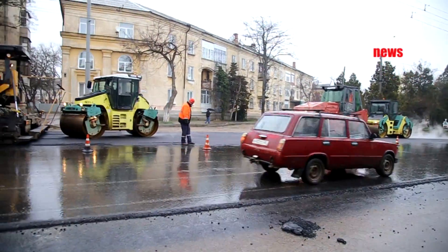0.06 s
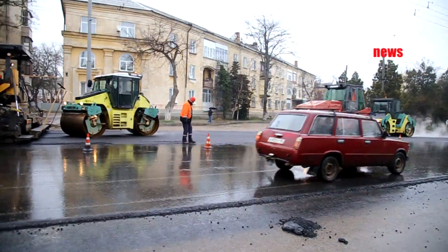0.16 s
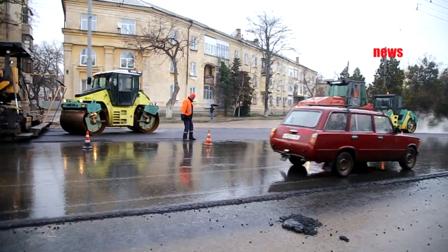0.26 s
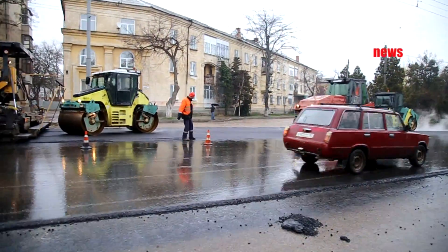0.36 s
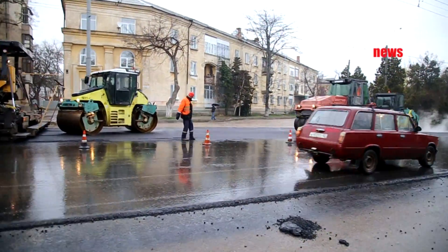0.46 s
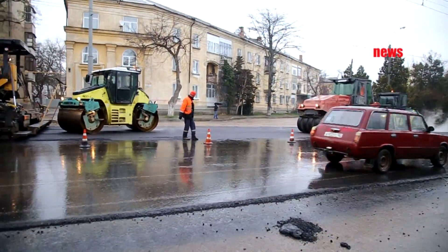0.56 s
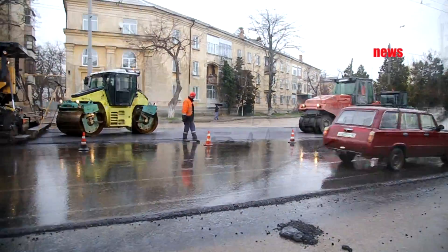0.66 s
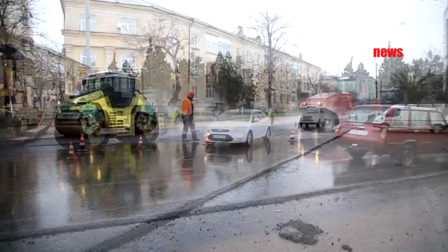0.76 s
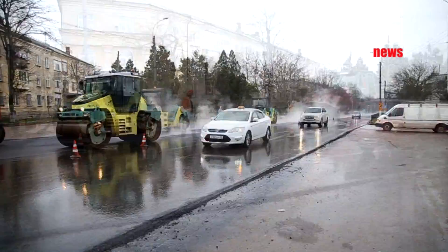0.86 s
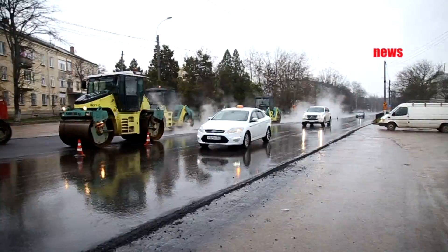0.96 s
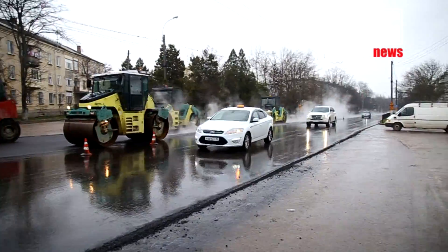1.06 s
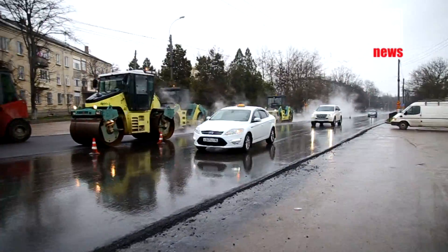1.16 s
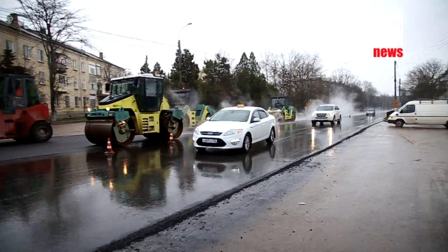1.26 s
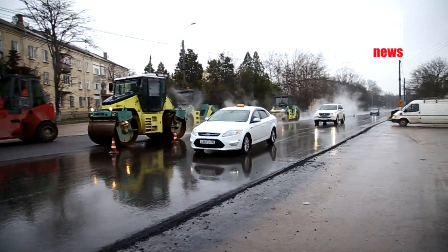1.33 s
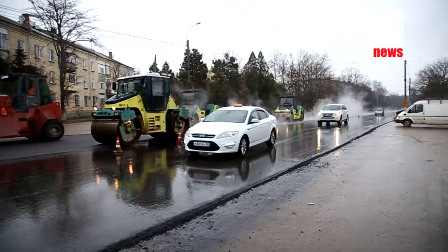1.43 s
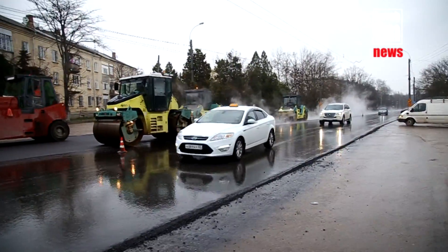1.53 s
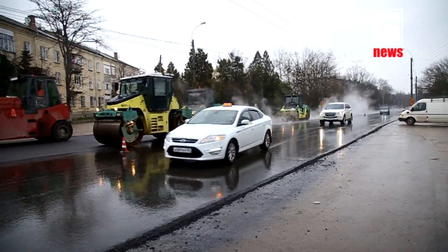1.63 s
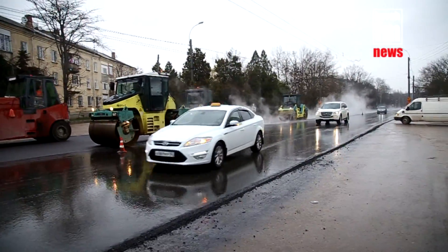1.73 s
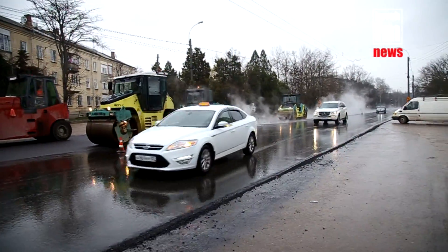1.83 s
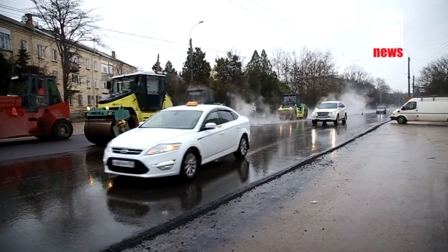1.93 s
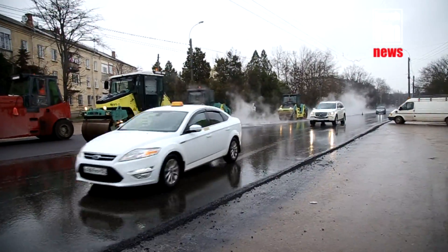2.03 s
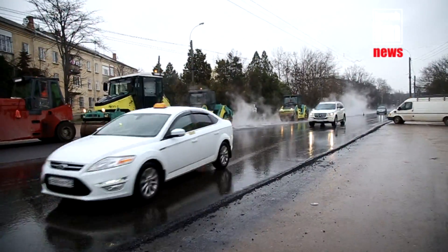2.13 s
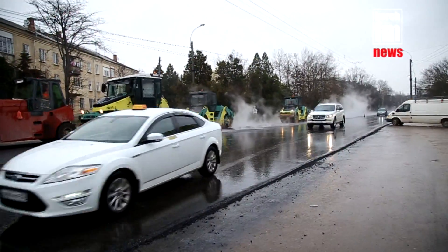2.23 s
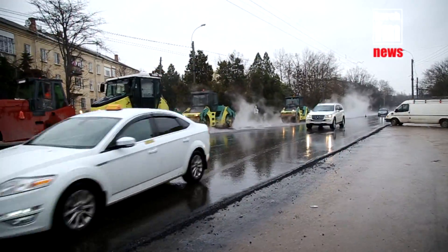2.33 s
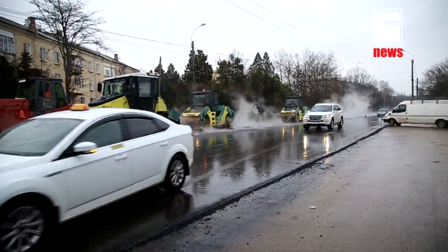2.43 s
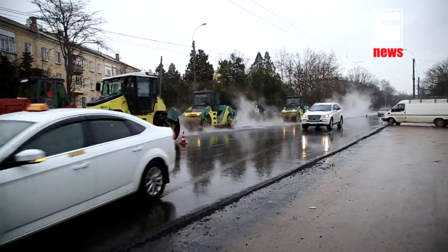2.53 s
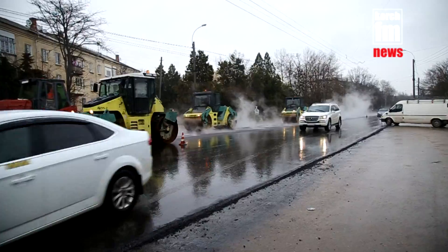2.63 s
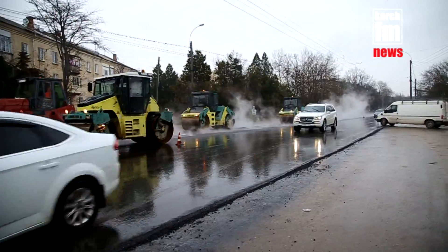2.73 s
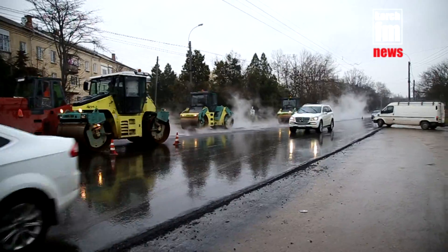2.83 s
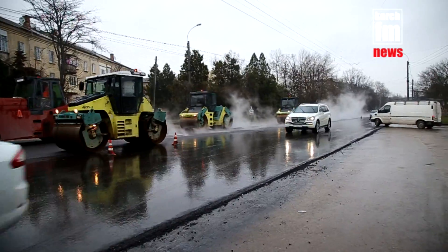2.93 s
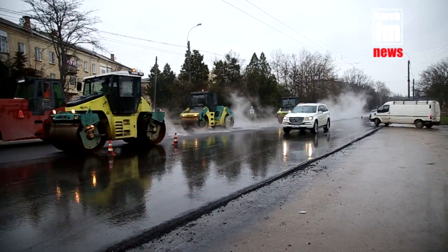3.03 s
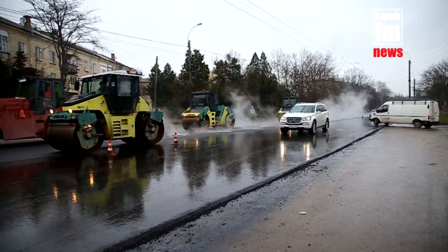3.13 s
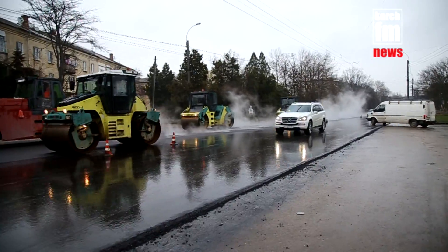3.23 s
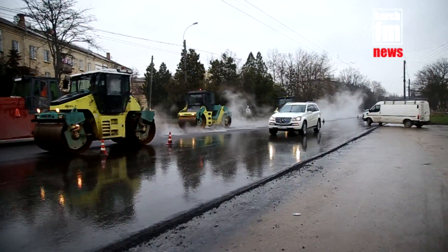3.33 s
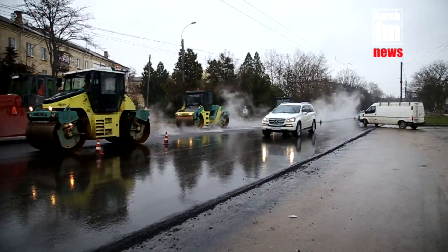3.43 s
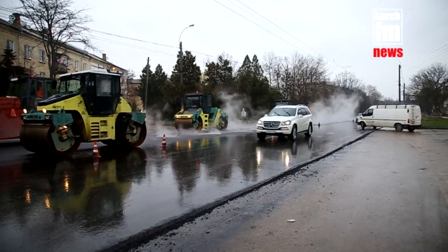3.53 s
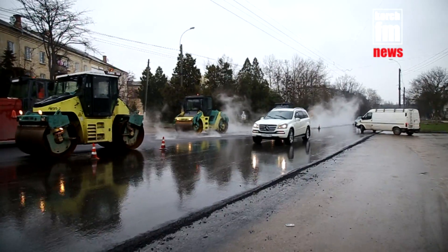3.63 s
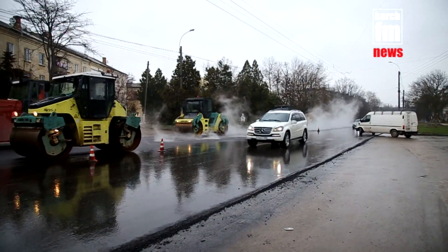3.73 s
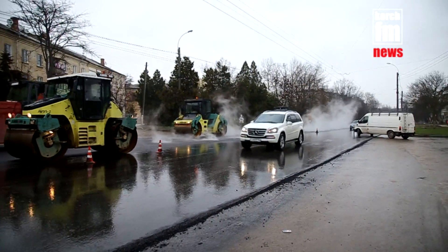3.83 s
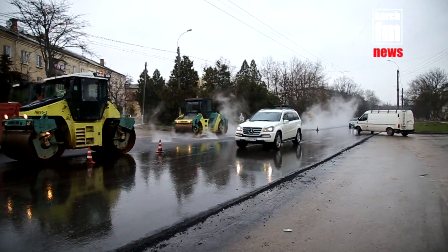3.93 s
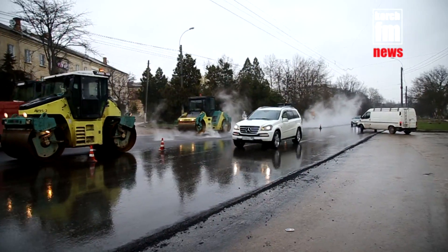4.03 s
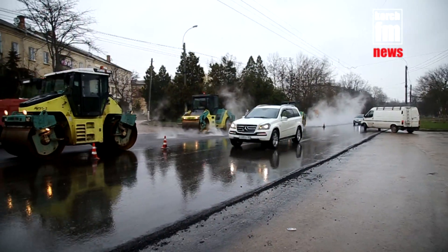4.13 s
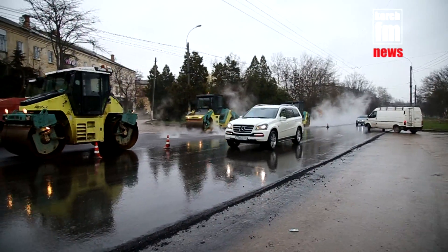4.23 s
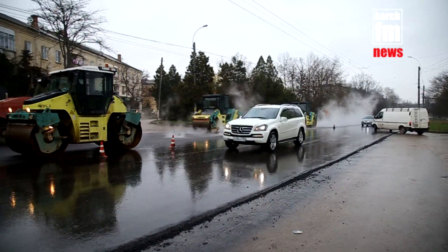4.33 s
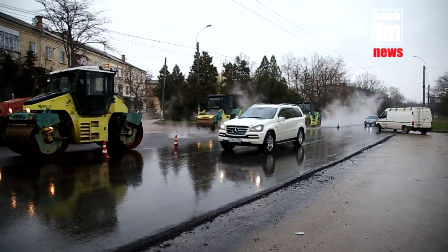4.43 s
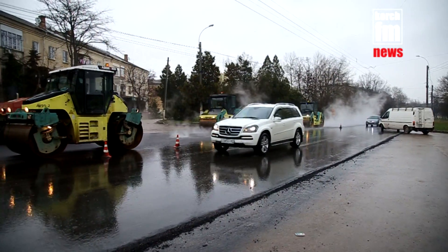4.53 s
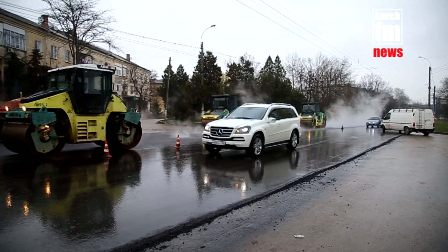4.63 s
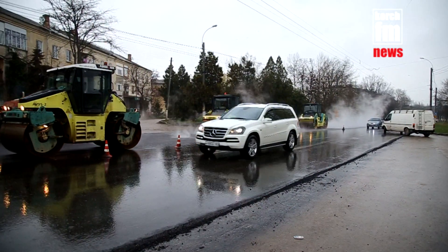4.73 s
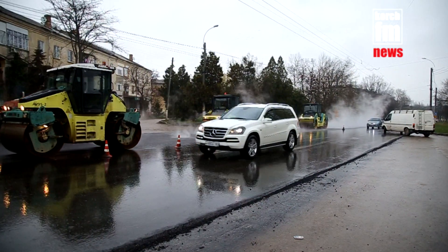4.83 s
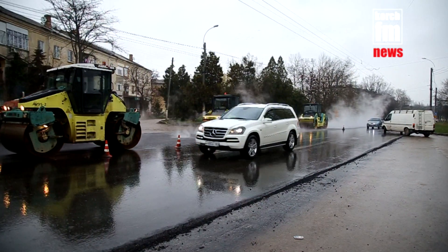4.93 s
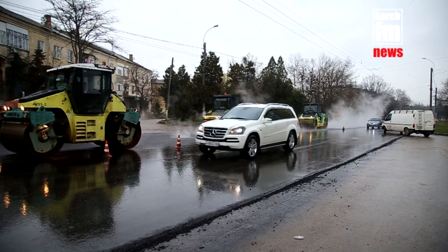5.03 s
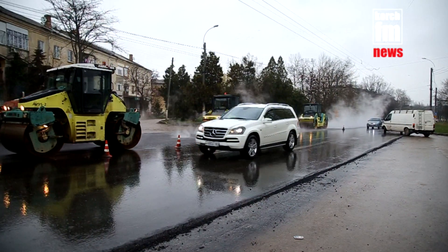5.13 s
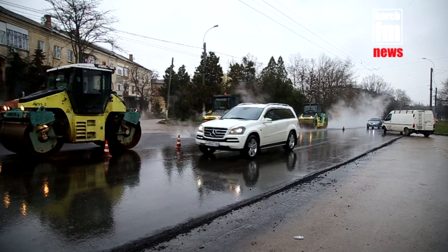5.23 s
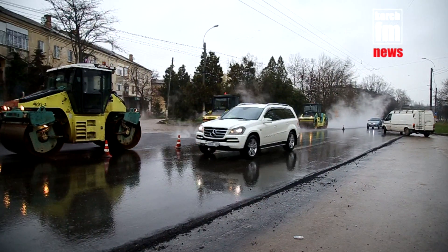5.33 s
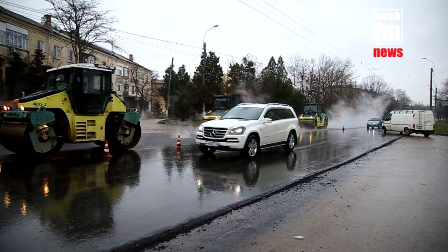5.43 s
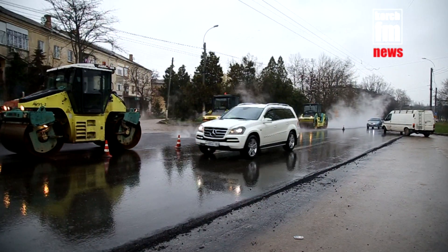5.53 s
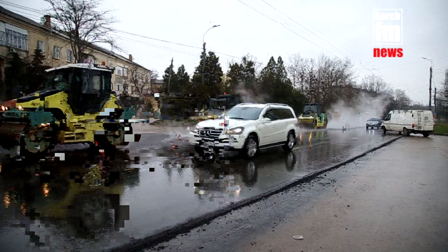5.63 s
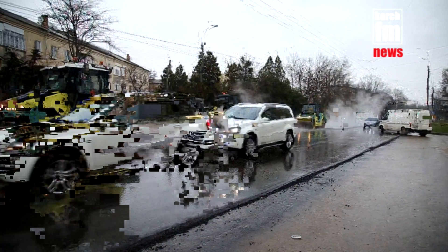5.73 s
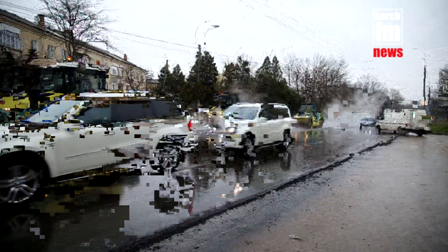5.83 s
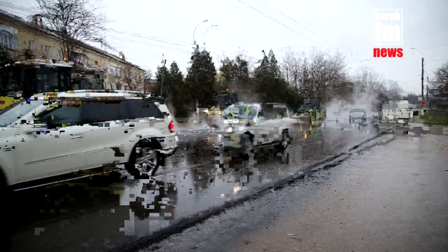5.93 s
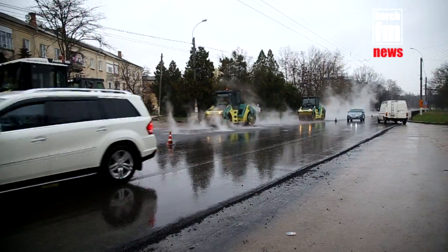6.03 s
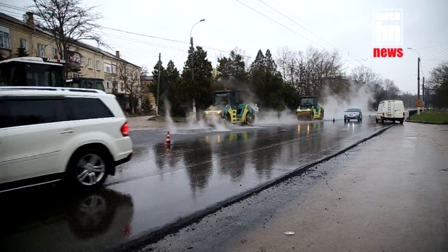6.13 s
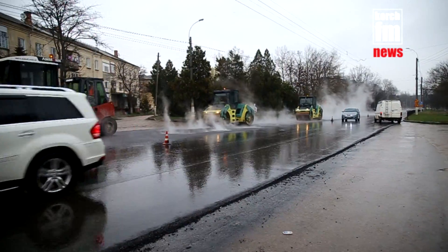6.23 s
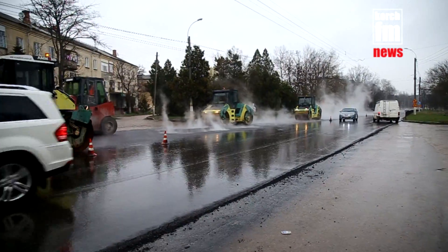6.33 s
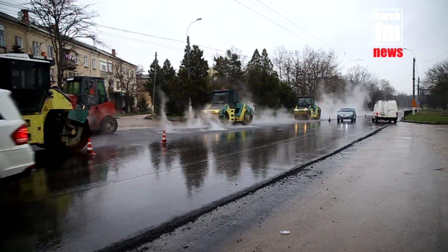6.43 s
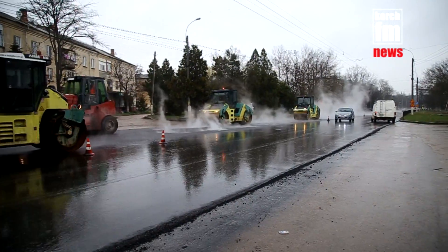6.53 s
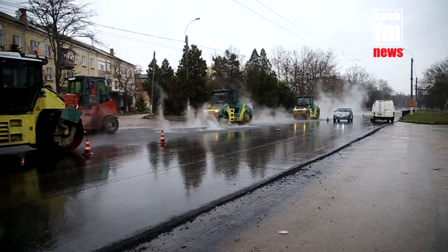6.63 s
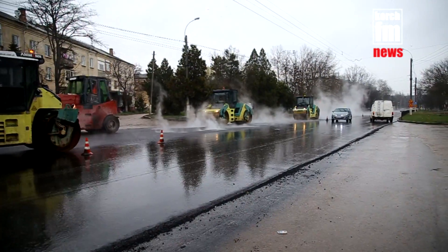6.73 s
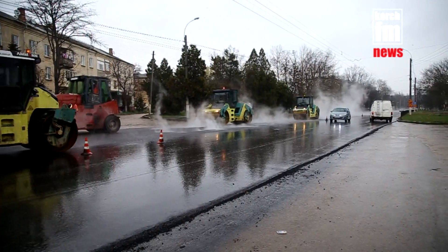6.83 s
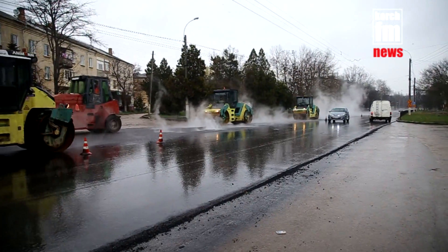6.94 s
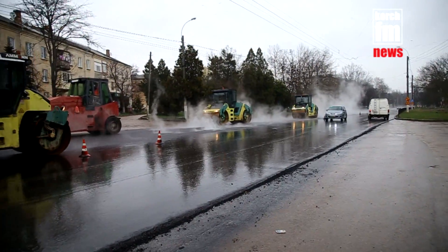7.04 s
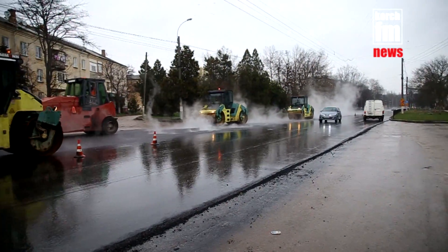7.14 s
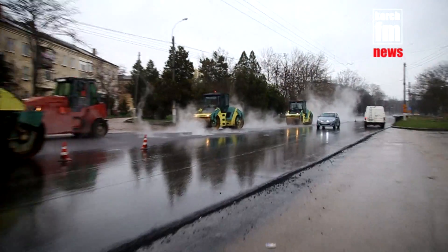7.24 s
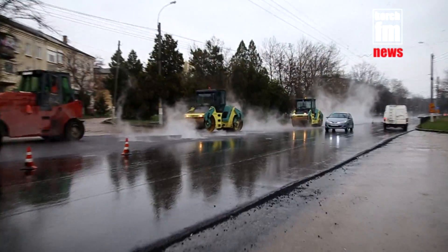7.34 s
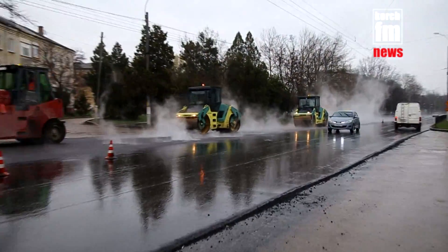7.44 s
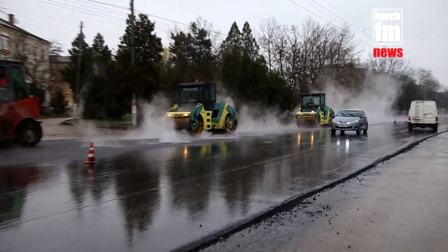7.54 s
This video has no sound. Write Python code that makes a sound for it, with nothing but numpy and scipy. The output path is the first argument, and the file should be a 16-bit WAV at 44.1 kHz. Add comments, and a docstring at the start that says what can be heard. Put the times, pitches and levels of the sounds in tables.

```python
"""Diesel road rollers work on fresh asphalt beside a wet street: from the outset their firings throb,
an exhaust drones, and a pump and gears whine. In the first second, friction excites a squeak and a
brake-like squeal. Cars then roll slowly past one after another, their treads hissing and spitting
water and grit. Just past the middle all sound drops out for most of a second; the engines
return, and two more cars pass."""
import sys
import numpy as np
from scipy import signal
from scipy.fft import rfft, irfft, next_fast_len
from scipy.io import wavfile
from scipy.ndimage import map_coordinates

SR = 44100
rng = np.random.default_rng(int(sys.argv[2]) if len(sys.argv) > 2 else 0)


def bounce(signal):
    """Save signal as a 16-bit WAV file at the path given by the first command-line argument."""
    frames = np.transpose(np.atleast_2d(signal))
    limited = np.clip(frames, -1, 1)
    pcm = np.round(limited * 32767).astype(np.int16)
    wavfile.write(sys.argv[1], SR, pcm)


N = 334100
TIME = np.arange(N) / SR


def from_db(db):
    """Amplitude ratio of a level in decibels."""
    return 10 ** (np.asarray(db) / 20)


def rms_one(x):
    """Normalisation to unit power."""
    return x / np.sqrt(np.mean(x ** 2) + 1e-20)


def in_time(table):
    """Linear interpolation of each column over the times in the first."""
    s, *columns = np.transpose(table)
    return [np.interp(TIME, s, c) for c in columns]


def bump(middle_s, half_s):
    """Gaussian envelope: 1 at the middle, 1/e at half_s to either side."""
    return np.exp(-((TIME - middle_s) / half_s) ** 2)


def drift(rate):
    """Low-pass noise of unit spread, changing about `rate` times a second."""
    step, settle = 40, 2000
    pole = np.exp(-2 * np.pi * step * rate / SR)
    noise = rng.standard_normal(N // step + settle + 2)
    slow = signal.lfilter([1], [1, -2 * pole, pole * pole], noise)[settle:]
    return np.interp(np.arange(N) / step, np.arange(len(slow)), rms_one(slow))


def colour(x, spectrum):
    """Spectral shaping to unit power, falling 30 dB an octave beyond the ends of the spectrum."""
    size = next_fast_len(N)
    log_hz = np.log2(np.maximum(np.arange(size // 2 + 1) * SR / size, 1))
    points, db = np.log2(np.array(spectrum)[:, 0]), np.array(spectrum)[:, 1]
    octaves_outside = np.abs(log_hz - np.clip(log_hz, points[0], points[-1]))
    gain = from_db(np.interp(log_hz, points, db) - 30 * octaves_outside)
    return rms_one(irfft(rfft(x, size) * gain, size)[:N])


def resonate(x, hz, width_hz):
    """A damped second-order resonator with unit peak gain."""
    r = np.exp(-np.pi * width_hz / SR)
    feedback = [1, -2 * r * np.cos(2 * np.pi * hz / SR), r * r]
    return signal.lfilter(np.array([1, 0, -1]) * (1 - r * r) / 2, feedback, x + 1e-18)


def turning(hz, wander):
    """Phase in cycles: the integral of a slightly unsteady frequency."""
    return rng.random() + np.cumsum(hz * (1 + wander * drift(1.97))) / SR


def tones(cycles, orders, flutter_db, rough=.15):
    """Harmonics of one phase, each with slow and fast random amplitude modulation."""
    out = 0
    for k, db in orders:
        level = from_db(db + flutter_db * drift(3.6)) * (1 + rough * drift(19))
        out = out + np.sqrt(2) * level * np.sin(2 * np.pi * (round(k) * cycles + rng.random()))
    return out


# Hums and moans among the machines.
# Each row: middle and half length in seconds, frequency and width in Hz, level in dB.
HUMS = [(.4, .5, 135, 45, -28), (.24, .09, 827, 12, -31.5), (1.899, .7, 203.6, 3.95, -30),
        (2.25, 0.25, 798, 45, -34.5), (2.732, 0.079, 728, 56, -27), (3.25, .23, 753, 44, -33),
        (3.68, 0.43, 591, 6, -33.5), (4.27, .1, 1137, 20, -31), (4.399, 0.16, 142.8, 9, -24),
        (6.684, .18, 192.8, 49.7, -25.5), (7.3, .16, 205.2, 70, -22.5)]
def hums():
    """Narrow resonances, briefly excited: each is a tone whose pitch wavers about its centre."""
    out = np.zeros(N)
    for s, half_s, hz, width_hz, db in HUMS:
        cycles = np.cumsum(hz + .5 * width_hz * drift(width_hz)) / SR
        out += np.sqrt(2) * from_db(db) * bump(s, half_s) * np.sin(2 * np.pi * cycles)
    return out


# Swells of the squeal. Each row: middle and half length in seconds, level in dB.
BRAKE_RUBS = [(.35, .24, -26.5), (.73, .11, -28.5)]
def brake(hz=1211):
    """Friction sustains one resonance, as in a rubbing brake: a tone in a narrow band of noise."""
    core = tones(turning(hz, wander=.0017), [(1, .0029)], flutter_db=0)
    haze = rms_one(resonate(rng.standard_normal(N), hz, width_hz=90))
    envelope = sum(from_db(db) * bump(s, half_s) for s, half_s, db in BRAKE_RUBS)
    return envelope * rms_one(core + .9 * haze)


# Course of the squeak. Each row: time in seconds, pitch in Hz, level in dB.
SQUEAK = [(.38, 2260, -58.5), (.39, 2245, -23.5), (.4, 2350, -28.5), (.42, 2320, -20), (.435, 2345, -61)]
# Its harmonics. Each row: multiple of the pitch, relative level in dB.
SQUEAK_ORDERS = [(1, 2.5), (4, -28), (5, -17.5)]
def squeak():
    """Friction of metal on metal excites a brief, scratchy vibration that slides up in pitch."""
    hz, db = in_time(SQUEAK)
    sounding = (TIME > SQUEAK[0][0]) & (TIME < SQUEAK[-1][0])
    scratch = 1 + .3 * drift(200)
    cycles = turning(hz * (1 + .0085 * drift(150)), wander=.00092)
    return sounding * scratch * from_db(db) * tones(cycles, SQUEAK_ORDERS, flutter_db=2)


# Stone chips under the tyres. Each row: start in seconds, level in dB, ring frequency in Hz.
GRIT = [(.012, -16, 4400), (.053, -11, 3620), (.143, -11, 4000), (.154, -8, 3810), (.164, -14, 4300),
        (.556, -12.5, 4100), (.632, -14, 3500), (2.444, -15, 4000), (6.269, -12.5, 3800),
        (6.572, -15, 5000), (6.687, -16, 3700), (6.807, -13.5, 3300)]
def grit(crack=.12, decay_s=.0027, scatter_hz=170):
    """Impact excitation: a chip flicked by a tread rings in three close modes, with a faint crack."""
    out = np.zeros(N)
    age = np.arange(SR // 20) / SR
    for s, db, hz in GRIT:
        modes = hz + scatter_hz * rng.standard_normal((3, 1))
        clink = np.sin(2 * np.pi * modes * age).mean(axis=0)
        broad = rms_one(resonate(resonate(rng.standard_normal(len(age)), hz, hz), hz, 2 * hz))
        start = round(s * SR)
        out[start:start + len(age)] += from_db(db) * (clink + crack * broad) * np.exp(-age / decay_s)
    return out


def droplets(per_s, spread_db):
    """Shot noise of unit power: random tiny impacts, mostly weak, a few strong."""
    sizes = from_db(spread_db * np.minimum(rng.exponential(1, N), 5)) * rng.choice([-1, 1], N)
    return rms_one(sizes * (rng.random(N) < per_s / SR))


def nearness(delay_s=0):
    """Geometry of a straight pass: each car's least distance over its present distance."""
    return np.array([
        1 / np.hypot(1, (TIME - s - delay_s) / np.where(TIME < s + delay_s, approach_s, departure_s))
        for s, approach_s, departure_s, *_ in CARS])


def traffic(near, cars_db, fall, far_db=-np.inf):
    """Incoherent sources add in power; each car's amplitude goes as 1 / distance ** fall."""
    each = from_db(cars_db)[:, None] * near ** fall
    return np.sqrt(np.sum(each ** 2, axis=0) + from_db(far_db) ** 2)


def road_reflection(x, near, lag_ms):
    """Interference with the echo off the wet road forms a faint comb, set by the nearest car."""
    strength = .24 * near.max(axis=0)
    weight = near ** 4
    lag_samples = lag_ms @ weight / weight.sum(axis=0) * SR / 1000
    echo = map_coordinates(x, [np.arange(N) - lag_samples], order=3)
    return (x + strength * echo) / np.sqrt(1 + strength ** 2)


# Passing cars. Each row: closest moment, approach time and departure time in seconds; levels of
# hiss, tread squelch, spray and fine mist in dB; lag of the road's reflection in milliseconds.
CARS = [(.95, 1.3, 0.43, -23.5, -39.5, -39.5, -50, .295), (2.45, 1.0, 0.52, -22.5, -28.5, -34, -41, 0.28),
        (4.5, 0.63, .4, -30, -44, -41, -54, .278), (6.2, 1.0, .7, -23.5, -30.5, -35, -39, .3),
        (7.45, 0.8, 0.8, -23.5, -32.5, -40, -64.5, 0.26)]
# Tyres crossing puddles. Each row: middle and half length in seconds, boost in dB.
PUDDLES = [(2.712, .045, 0), (3.01, .04, 4), (3.127, .055, 4.5), (5.897, .04, 1.2), (6.32, 0.039, 1),
           (6.742, .06, 1.3)]
# Spectra of the four tyre sounds and of the treble wash of distant traffic.
# Each row: frequency in Hz, relative spectral density in dB.
HISS = [(600, -16.5), (1200, 0.5), (2000, 3), (3200, -2.9), (4200, -9), (5200, -11), (6500, -21.5),
        (9000, -42)]
SQUELCH = [(2500, -8), (3200, -3), (3900, -4), (4500, -4.5), (5400, -13)]
SPRAY = [(3000, -15.5), (4500, 3.5), (5600, 4), (7000, 0.5), (8400, -3), (9500, -11), (12500, -22)]
MIST = [(7500, -16.5), (8900, -2), (10000, -0.5), (11000, 0), (12000, -1), (13500, -5.5), (15000, -14)]
WASH = [(4500, -2), (7000, -7), (10000, -6), (12500, -7), (15000, -20)]
def wet_tyres(fade_in_at_s=.82, rise_s=.1, muted_db=-9.5):
    """Treads squeeze water off the road and throw up drops, whose many impacts sum to noise."""
    *_, hiss_db, squelch_db, spray_db, mist_db, lag_ms = np.transpose(CARS)
    near = nearness()
    behind = nearness(delay_s=.14)  # squelch radiates backwards, so it peaks later
    # the spray and squelch start muted and fade in just before one second
    spray_fade_in = from_db(muted_db * (.5 - .5 * np.tanh((TIME - fade_in_at_s) / rise_s)))
    puddle_db = sum(db * bump(s, half_s) for s, half_s, db in PUDDLES)
    hiss = colour(droplets(per_s=14000, spread_db=3), HISS)
    hiss *= traffic(near, hiss_db, fall=1.95, far_db=-33.5)
    squelch = colour(droplets(per_s=3500, spread_db=4.5), SQUELCH)
    squelch *= spray_fade_in * traffic(behind, squelch_db, fall=2.1)
    drops = droplets(per_s=8300, spread_db=4)
    spray = colour(drops + .8 * rng.standard_normal(N), SPRAY)
    spray *= spray_fade_in * traffic(near, spray_db, fall=1.5)
    mist = colour(drops + .8 * rng.standard_normal(N), MIST)
    mist *= from_db(.5 * puddle_db) * traffic(near, mist_db, fall=2.1)  # surges most in puddles
    wash = from_db(-45.5) * colour(rng.standard_normal(N), WASH)
    sputter = from_db(puddle_db + .52 * drift(25))  # the water film is uneven
    return road_reflection(wash + (hiss + squelch + spray + mist) * sputter, near, lag_ms)


# Strength of the whines. Each row: time in seconds, pump level in dB, gear level in dB.
WHINE = [(0, -39, -40), (.7, -39, -35.5), (1.1, -54, -43), (3.3, -40, -45), (4.6, -36.5, -42),
         (5.5, -32, -37.5), (6.2, -36, -39), (6.9, -32, -39.5), (7.58, -34.5, -36)]
# Gear tones. Each row: multiple of the fast engine's firing rate, relative level in dB.
GEAR_ORDERS = [(16, -2), (17, -1), (32, -4.5), (34, -6.5)]
def pump_and_gears(engine_cycles, pump_hz=456.6):
    """Periodic forcing: a hydraulic pump sings one tone, and gears whine in step with the engine."""
    pump_db, gears_db = in_time(WHINE)
    pump = tones(turning(pump_hz, wander=.002), [(1, 0)], flutter_db=.4, rough=.25)
    gears = tones(engine_cycles, GEAR_ORDERS, flutter_db=1, rough=.86)
    return from_db(pump_db) * pump + from_db(gears_db) * gears


# Course of the drone. Each row: time in seconds, pitch in Hz, level in dB.
DRONE = [(0, 281.5, -25), (.45, 280.5, -21.5), (.9, 280.3, -27), (1.38, 278.8, -22), (2.25, 277.5, -32.5),
         (2.65, 278, -28.5), (3.15, 280, -19.5), (3.7, 278.7, -20.5), (4.6, 279.5, -23),
         (5.62, 277.7, -26.5), (5.85, 277, -36), (7.0, 277, -32), (7.58, 276.4, -44)]
# Its spells of beating. Each row: middle and half length in seconds, rate in Hz, depth in dB.
BEATS = [(1.061, .28, 6.6, 5), (4.115, .28, 25.6, 3)]
def exhaust_drone():
    """Amplitude modulation: one exhaust tone swells and fades as the rollers move, and briefly beats."""
    pitch_hz, level_db = in_time(DRONE)
    beat_db = sum(db * bump(s, half_s) * np.cos(2 * np.pi * hz * (TIME - s))
                  for s, half_s, hz, db in BEATS)
    tone = tones(turning(pitch_hz, wander=.001), [(1, 0)], flutter_db=1.04, rough=.089)
    return from_db(level_db + beat_db) * tone


def firing(cycles, fade, uneven_db):
    """A pulse train: each firing has its own strength and decays exponentially over its cycle."""
    strength = from_db(uneven_db * rng.standard_normal(1024))
    return rms_one(strength[cycles.astype(int) % len(strength)] * np.exp(-fade * (cycles % 1)))


# Engines under load. Each row: time in seconds, relative levels of rumble, clatter and throb in dB.
LOAD = [(0, -30.5, -28, -1.5), (.4, -24.5, -28, 1.5), (.97, -27, -30, -2.5), (1.2, -27.5, -26, 1.5),
        (2.2, -28, -27.5, 1), (2.55, -28, -29, 1.5), (3.6, -24, -25.5, -1.5), (4.6, -24, -26.5, 0),
        (5.6, -27.5, -26, -1), (6.7, -24, -26.5, 0), (7.58, -27.5, -27, -.5)]
# Tones of the three engines. Each row: multiple of the firing rate, relative level in dB.
SLOW_ORDERS = [(1, -36), (2, -33.5), (5, -35)]
FAST_ORDERS = [(1, -33.5), (2, -41.5)]
IDLE_ORDERS = [(1, -39.5), (2, -44.5), (6, -42)]
# Exhaust and body resonances. Each row: frequency and bandwidth in Hz, relative gain in dB.
BODY_MODES = [(143.8, 12, 1), (188.5, 20.3, 2.5), (229, 36, -1.5), (249.2, 16, 2), (306.2, 16, -1.5),
              (390, 51, -14), (424, 11, -10.5)]
# Spectra of the engine noise. Each row: frequency in Hz, relative spectral density in dB.
BASS = [(30, -27.5), (42, -9), (60, 1.5), (85, -3.5), (115, -2.5), (200, -4), (400, -7.5), (700, -34)]
CLATTER = [(200, -8.5), (350, -2.5), (500, -2), (720, -0.5), (950, -2.5), (1250, -3), (1700, -5.5),
           (2500, -9.5), (4000, -14), (7000, -35.5)]
def diesels(slow, fast, idle):
    """Forced vibration: firings give low harmonics, excite exhaust resonances and rattle the blocks."""
    rumble_db, clatter_db, throb_db = in_time(LOAD)
    throb = tones(slow, SLOW_ORDERS, flutter_db=1.5, rough=.05)
    throb += tones(fast, FAST_ORDERS, flutter_db=1.5, rough=.054)
    throb += tones(idle, IDLE_ORDERS, flutter_db=1)
    puffs = rng.standard_normal(N) * firing(fast, fade=1.2, uneven_db=1.5)
    ringing = sum((-1) ** k * from_db(db) * resonate(puffs, hz, width_hz)
                  for k, (hz, width_hz, db) in enumerate(BODY_MODES))
    band = signal.butter(2, [110, 520], "band", fs=SR, output="sos")
    rumble = from_db(rumble_db - 1.76) * rms_one(signal.sosfilt(band, ringing))
    knocks = firing(slow, fade=.45, uneven_db=1.85) + firing(fast, fade=.45, uneven_db=.8)
    clatter = from_db(clatter_db + 3) * colour(rng.standard_normal(N) * knocks, CLATTER)
    bass = from_db(-30) * colour(rng.standard_normal(N), BASS)
    return from_db(throb_db) * (throb + bass) + rumble + clatter


def scene():
    """Superposition: machines and traffic in the open street add in one channel."""
    # firing cycles of the three engines
    slow = turning(hz=40.55, wander=.0015)
    fast = turning(hz=71.2, wander=.0008)
    idle = turning(hz=50.1, wander=.0039)
    rollers = diesels(slow, fast, idle) + exhaust_drone() + pump_and_gears(fast)
    return (rollers + hums() + wet_tyres() + grit() + brake() + squeak())[None, :]


def record(dry, low_hz=30, high_hz=15200, silent_from_s=4.6285, silent_to_s=5.4915):
    """Band limiting and gating: the deepest bass and top treble are cut, and the sound drops out once."""
    high_pass = signal.butter(4, low_hz, "high", fs=SR, output="sos")
    low_pass = signal.ellip(12, .1, 80, high_hz, fs=SR, output="sos")
    gate = (TIME < silent_from_s) | (TIME > silent_to_s)
    return signal.sosfilt(low_pass, gate * signal.sosfilt(high_pass, dry))


dry = scene()
out = record(dry)
bounce(out)
```